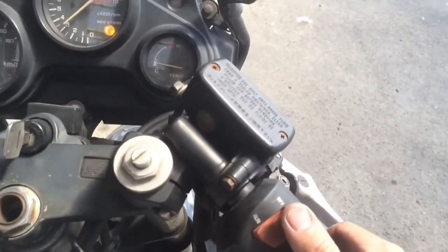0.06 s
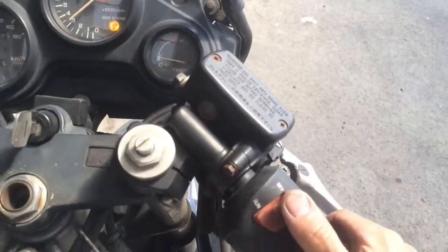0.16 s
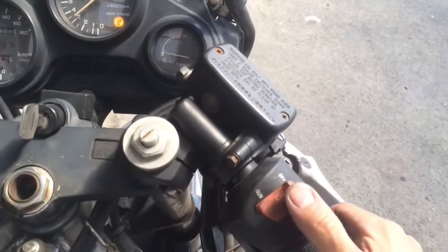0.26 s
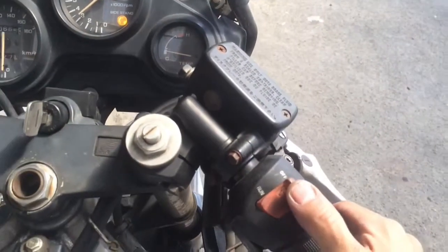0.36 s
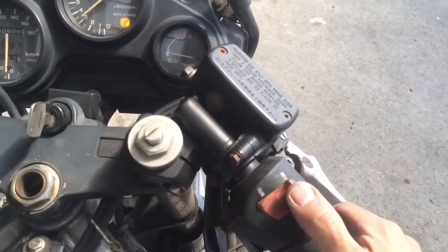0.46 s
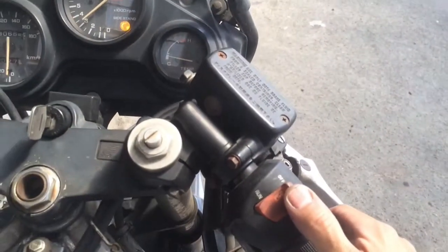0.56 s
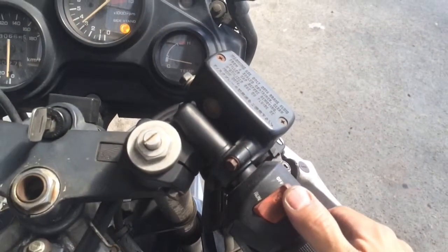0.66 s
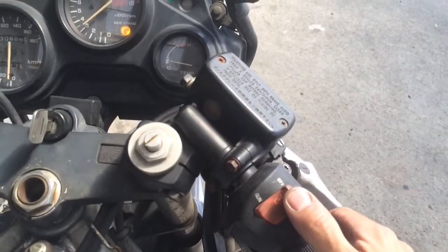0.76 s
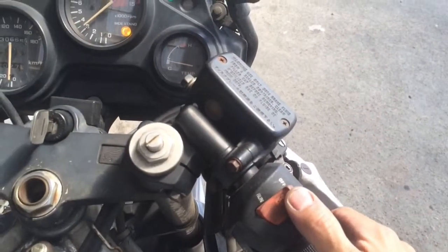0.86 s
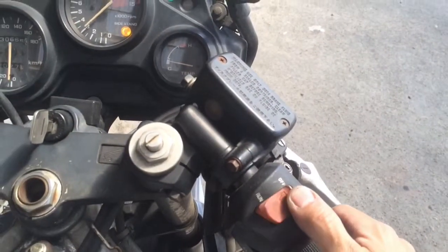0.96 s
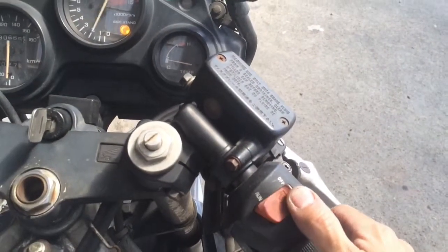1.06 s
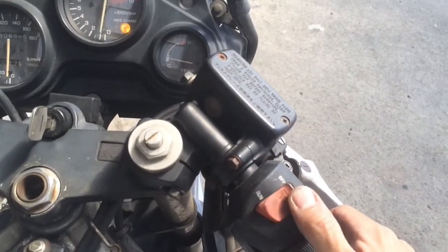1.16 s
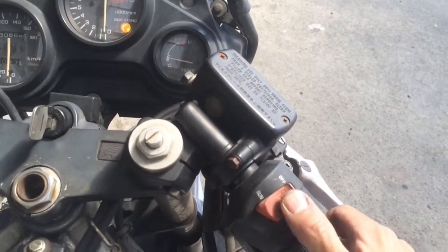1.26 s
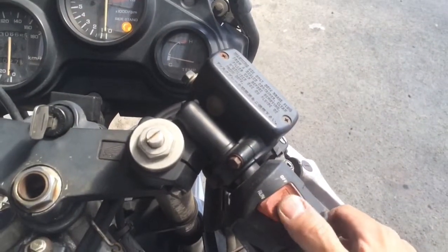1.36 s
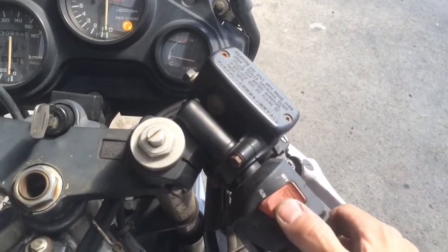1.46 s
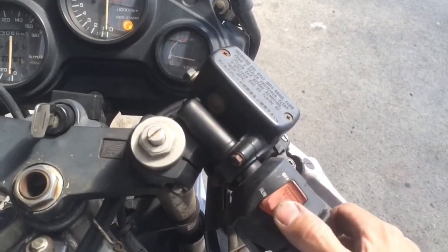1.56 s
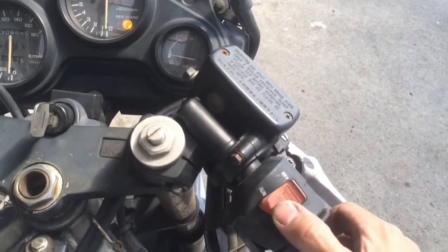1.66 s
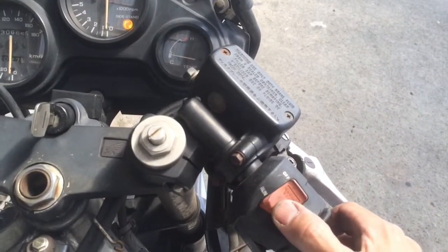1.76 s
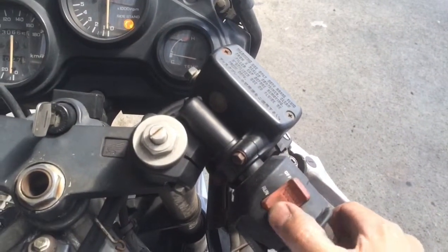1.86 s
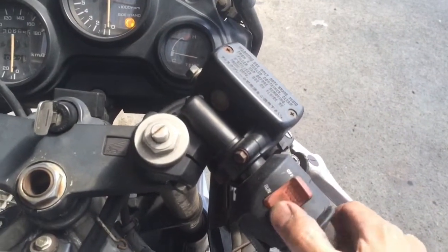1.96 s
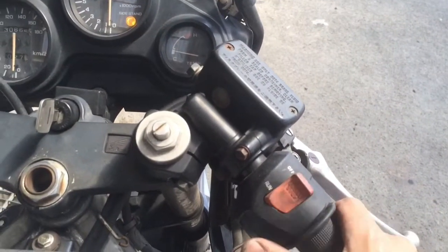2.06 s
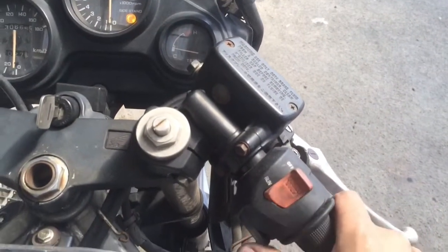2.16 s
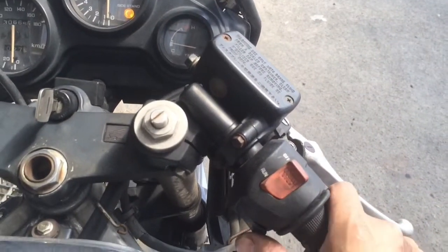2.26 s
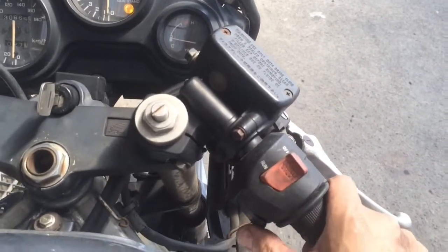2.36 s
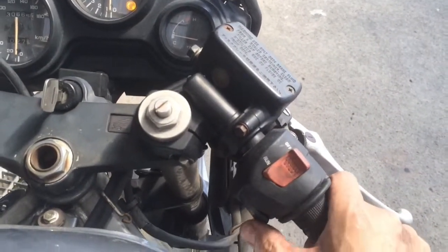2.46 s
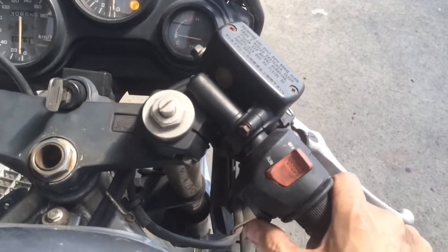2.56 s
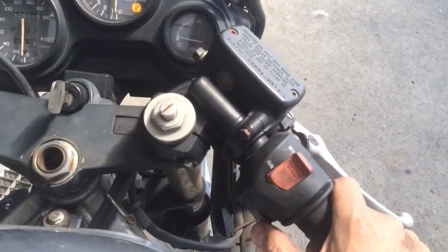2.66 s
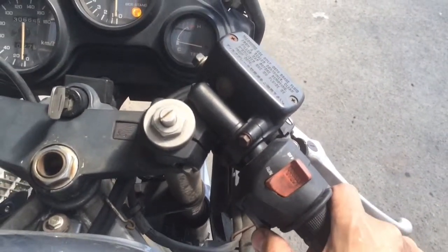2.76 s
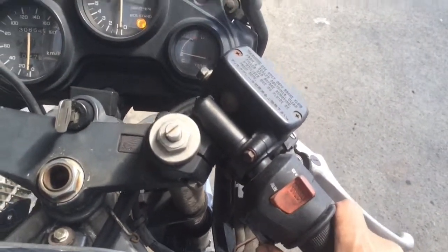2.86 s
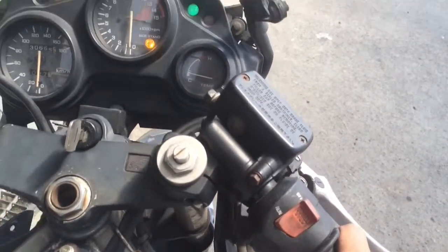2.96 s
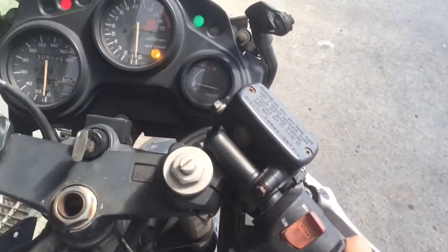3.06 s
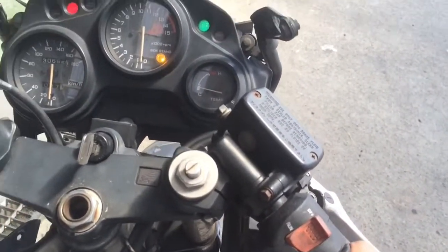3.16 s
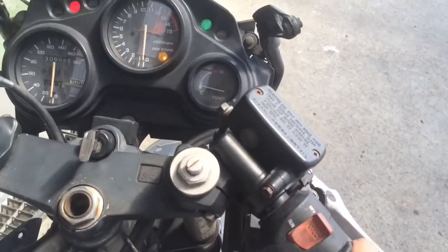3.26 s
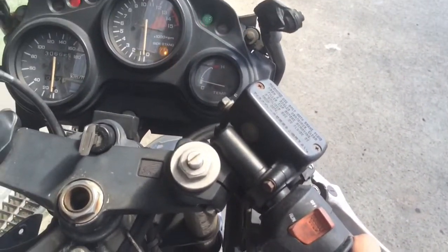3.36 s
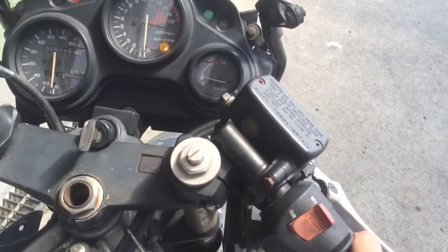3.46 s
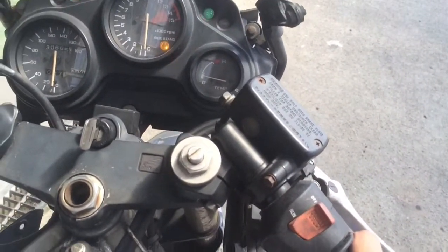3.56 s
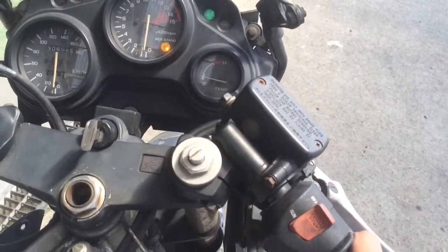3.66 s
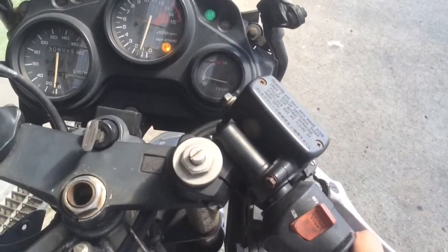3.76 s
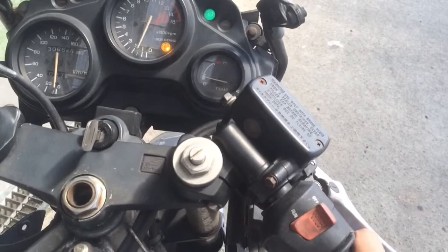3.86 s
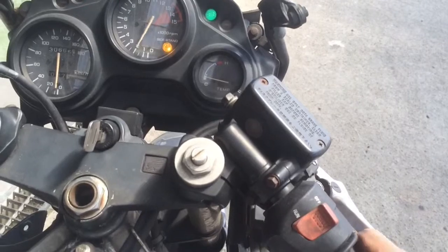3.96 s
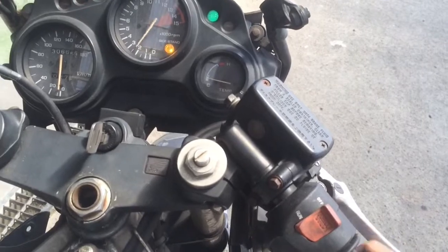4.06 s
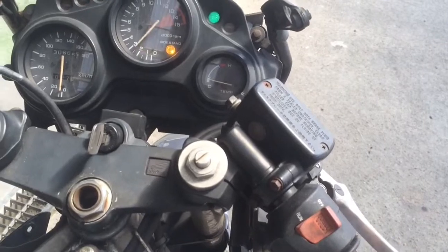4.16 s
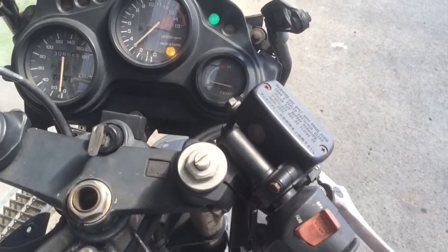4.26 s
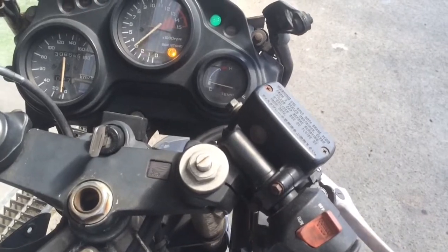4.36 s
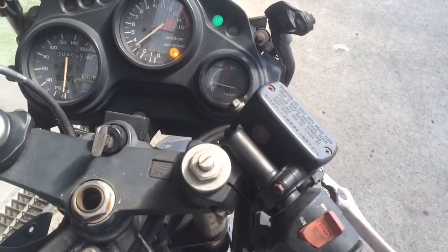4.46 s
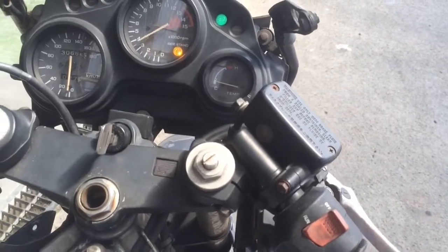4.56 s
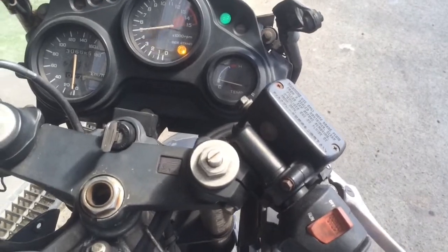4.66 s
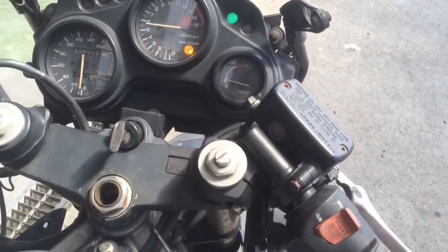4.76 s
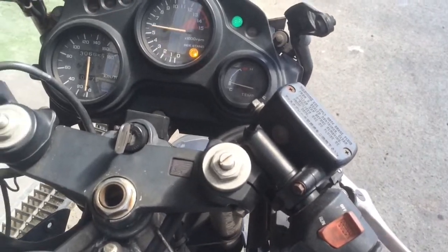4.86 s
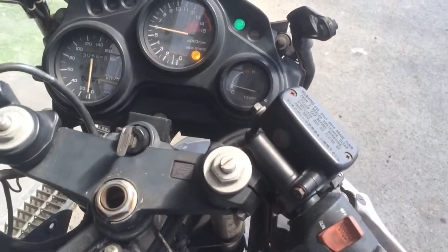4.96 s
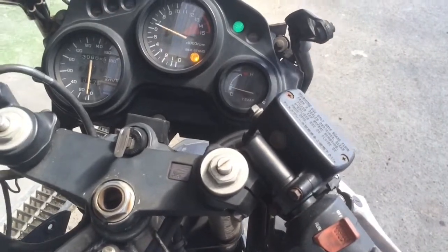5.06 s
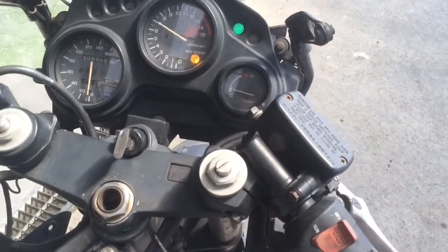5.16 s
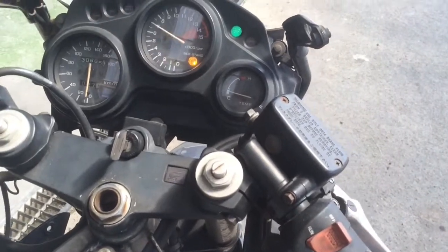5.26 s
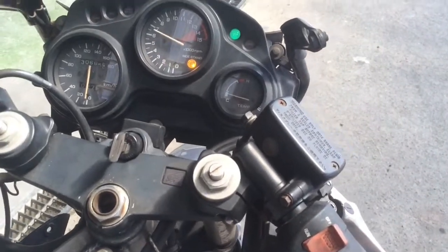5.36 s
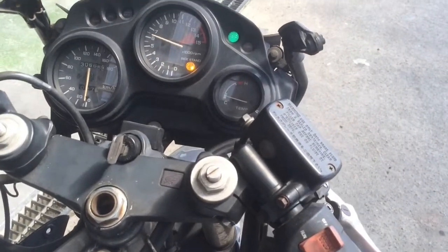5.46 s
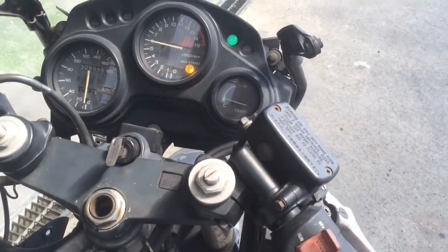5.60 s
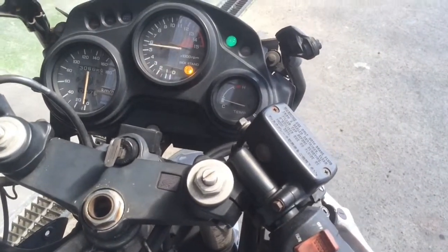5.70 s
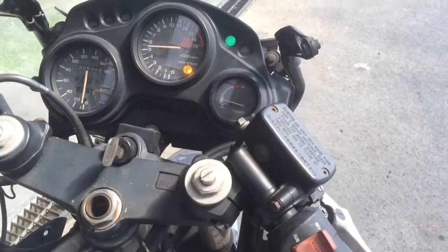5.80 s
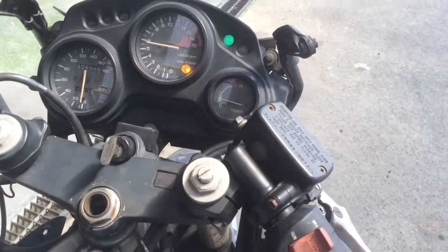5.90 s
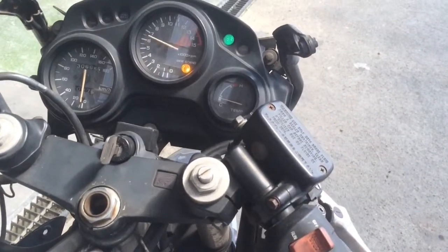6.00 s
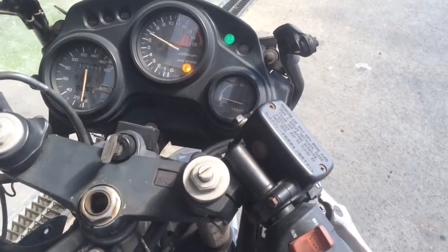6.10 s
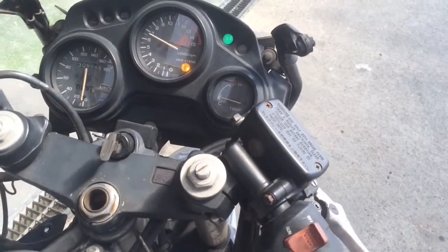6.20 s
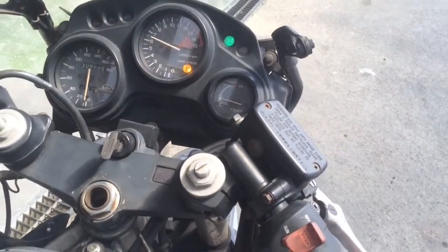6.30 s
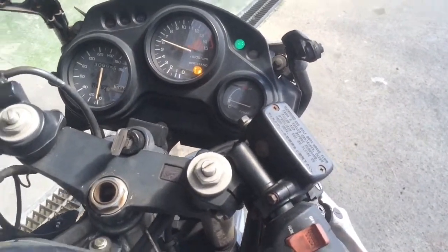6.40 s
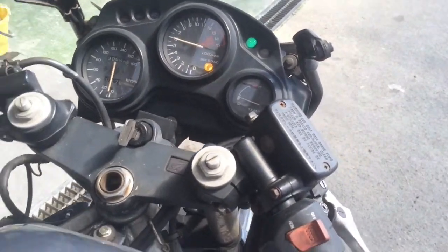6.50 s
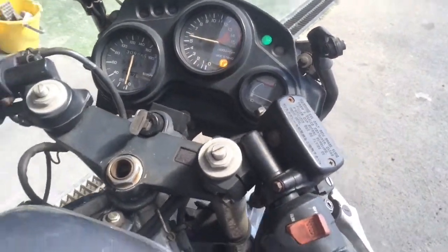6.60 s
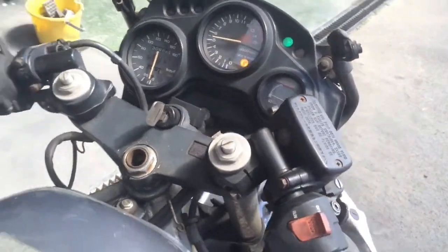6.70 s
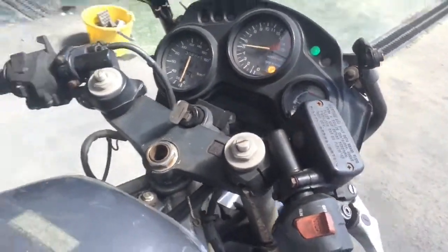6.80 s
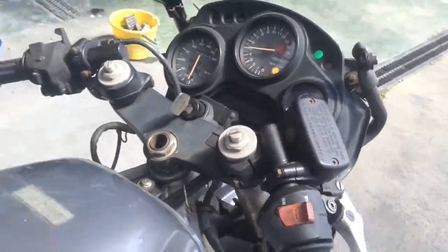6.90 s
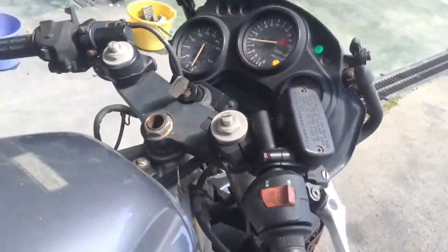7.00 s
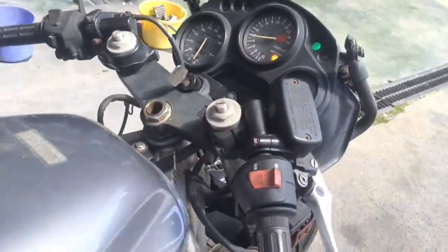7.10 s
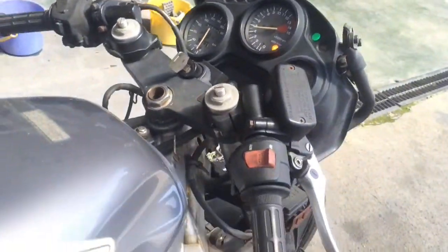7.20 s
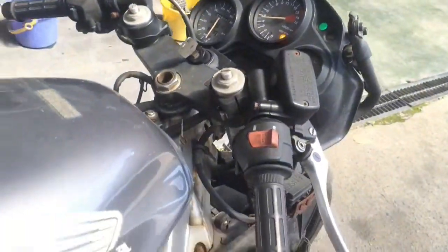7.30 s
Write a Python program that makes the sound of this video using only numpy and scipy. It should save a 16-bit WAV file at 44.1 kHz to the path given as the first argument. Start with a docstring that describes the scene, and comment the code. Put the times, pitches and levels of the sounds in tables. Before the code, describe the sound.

Outdoors and close to the microphone, a motorcycle's quick, ticking idle is cut by the sharp click of its kill switch. It winds down and ends with a clack, leaving a faint distant engine. After a second click, the starter cranks for a moment and the engine fires unevenly, then picks up. Two quick revs and a later third follow, and the engine sinks back toward idle.

```python
"""An open yard, heard from the handlebar of a small four-cylinder motorcycle at a fast idle.
The kill switch snaps, the engine runs down and stops with a clack; another engine chugs far off.
The switch is reset, the starter cranks, the engine catches and the throttle is blipped three times.
Periodic firings and turbulent gas excite the resonances of pipe and airbox, valve impacts ring
the case and meshing gears whine; crank speed and load govern their pitch and loudness."""
import sys
import numpy as np
from scipy import signal
from scipy.fft import rfft, irfft, next_fast_len
from scipy.io import wavfile
from scipy.ndimage import uniform_filter1d, map_coordinates

SR = 44100
rng = np.random.default_rng(int(sys.argv[2]) if len(sys.argv) > 2 else 0)


def to_wav(s):
    """Save 16-bit WAV."""
    ch = np.atleast_2d(s).T  # columns
    pcm = np.round(np.clip(ch, -1, 1) * 32767)  # PCM
    wavfile.write(sys.argv[1], SR, pcm.astype(np.int16))


N = 323694
TIME = np.arange(N) / SR
KILL_S, STOP_S, CATCH_S = 1.04, 1.6, 3.68

# crank speed with the throttle shut (idle, run-down, restart): time_s, speed_hz
IDLE_SPEED = [(0, 51.4), (.3, 52.2), (1.055, 52.2), (1.22, 35.3), (1.36, 24.3), (1.6, 9), (3.7, 29.8),
              (3.87, 30.9), (4.03, 36.5), (4.21, 48.7), (4.3, 52.4), (4.55, 55.7), (4.75, 63.3)]
# twists of the throttle grip: open_s, shut_s, opening_fraction
THROTTLE_BLIPS = [(4.553, 4.737, .85), (4.963, 5.12, 1), (5.85, 6.031, 1)]
# engine loudness without load: speed_hz, shake_db, exhaust_db, clatter_db
UNLOADED_LEVELS = [(10.1, -50, -57, -62), (18, -40.5, -45, -54), (30, -40.5, -42.5, -44.5),
                   (43, -48, -39, -41.5), (53.1, -43.5, -37.5, -38.5), (69, -42.5, -36, -33),
                   (94.3, -41, -32, -31.5), (110.6, -45, -35.5, -30.5), (126.4, -43, -29, -25.5)]
# low harmonics, keyed by multiple of crank speed: level_db, full_load_gain_db
CRANK_ORDERS = {1: (1, -12.5), 2: (-1, 2.5), 4: (-13.5, 8), 6: (-27, 10), 10: (-43, 14)}
# how loud the low engine tones sound at each pitch (airbox and pipe resonances,
# rippled by a ground or wall reflection): pitch_hz, gain_db
LOW_TONE_GAIN = [(25, -78), (45, -57), (52, -50), (62, -36.5), (85, -34), (94, -43), (104, -50), (128, -31),
                 (149, -33), (161, -40), (172, -26.5), (187, -40), (208, -23), (218, -26), (232, -22),
                 (255, -22.5), (280, -27), (400, -19.5), (470, -32.5), (560, -5), (640, -11.5),
                 (760, -10.5)]
# airbox resonances: pitch_hz, bandwidth_hz, gain_db
AIRBOX_MODES = [(77.6, 16.4, 4), (121, 104, -6.5), (186, 30, 5), (302, 124, -10.5)]
# cylinders in firing order: relative_db, delay_cycles
FIRING_ORDER = [(19, -0.0027), (8, 0.0053), (13, -0.00079), (15, 0.0064)]
# exhaust pipe resonances: pitch_hz, bandwidth_hz, gain_db
PIPE_MODES = [(390, 40, 4), (531, 37, 4.5), (625.6, 28, 7.5), (732, 79, 0), (876, 51, -1.5), (1156, 68, -4),
              (1200, 480, -6.5), (1870, 450, -27)]
# spectrum of turbulent gas: frequency_hz, relative_db
GAS_SPECTRUM = [(120, -12.5), (250, -3.5), (380, -0.5), (580, 4), (800, -1.5), (1100, -1), (1500, -3.5),
                (2200, -19), (5000, -39)]
# spectrum of mechanical clatter: frequency_hz, relative_db
CLATTER_SPECTRUM = [(600, -29), (1100, -16), (1600, -2), (2000, 2), (2600, 0), (3000, -3.5), (3600, -2),
                    (4900, -9), (5600, -6.5), (6400, -9.5), (8000, -14), (10000, -20.5), (13000, -28),
                    (16000, -31)]
# resonances of cylinder head, covers and fairing: pitch_hz, bandwidth_hz, gain_db
CASE_MODES = [(1083, 19, -2), (1186, 29, 0), (1610, 90, 2), (1908, 58, 3), (2147, 19, 7.5),
              (2240, 170, -2.5), (2770, 29, -1), (3060, 9.2, -13), (3200, 76, -4.5), (3674, 66, -2.5),
              (4080, 270, -14.5), (4920, 160, -3), (6130, 160, -8.5)]
# gear whine peaks; rows with the same tooth count are one mesh that sings at several speeds: teeth_per_turn,
# relative_db, loudest_speed_hz, speed_spread_hz
GEAR_MESHES = [(44, -2, 30, 5), (44, -7, 44, 4.5), (44, -7, 55, 2), (33.6, -5.5, 76, 2.5),
               (33.6, -9, 82, 2), (16.8, -7, 115, 9)]
# harmonics of the distant engine: beat_multiple, level_db
CHUG_HARMONICS = [(2, -66), (3, -58), (4, -73), (5, -66), (6, -64), (7, -64), (8, -73), (9, -70), (10, -74),
                  (12, -74), (13, -74), (20, -70), (61, -77), (63, -76), (64, -78)]
# spectrum of the outdoor noise: frequency_hz, relative_db
YARD_SPECTRUM = [(45, -6), (70, -20), (170, -1), (330, -1.5), (520, 1), (700, -10), (900, -5), (1250, -7),
                 (1620, -4), (1950, -13), (3700, -15), (6000, -23), (9000, -31.5), (15000, -39)]
# impacts in the kill switch: start_s, level_db
SWITCH_CLICKS = [(1.0403, -11.5), (1.9712, -25), (1.9724, -14), (2.126, -50)]
# modes of its plastic rocker: pitch_hz, relative_db, t60_s
ROCKER_MODES = [(1085, -11.5, 0.022), (2390, -21, .004), (4840, -14, 0.012), (6500, -5, 0.0033),
                (7600, -8.5, 0.0047), (10800, -8, .003)]
# impacts of the starter drive, at the stop and on engaging: start_s, rattle_db, thud_db
DRIVE_CLACKS = [(1.608, -34, -36), (3.374, -36, -58)]
# spectrum of the struck crankcase: frequency_hz, relative_db
CRANKCASE_SPECTRUM = [(120, -52), (200, -4), (647, 3), (833, -1), (1040, -4.5), (1750, -4), (2290, -7),
                      (2550, -7.5), (6650, -12.5), (7150, -14), (15000, -31)]
# starter surges after each compression: start_s, length_s, pinion_hz, level_db
STARTER_SURGES = [(3.394, 0.084, 909, -43), (3.519, 0.059, 963, -35.5), (3.633, 0.027, 997, -34.5)]
# spectrum of the starter case: frequency_hz, relative_db
STARTER_SPECTRUM = [(71, -37), (120, -37), (191, -2), (310, -24), (380, -11), (616, -16.5), (852, -7.5),
                    (1250, -22), (1690, -14), (3300, -19), (4120, -21.5), (11500, -32.5), (15000, -55)]
# single hard firings: start_s, pipe_drive_db, airbox_drive_db
HARD_FIRINGS = [(3.714, -21.5, -15), (3.818, -34, -25), (3.884, -43, -35), (3.945, -26.5, -18),
                (4.008, -40, -15), (4.586, -13, -11.5)]


def from_db(db):
    """Decibels to amplitude ratio."""
    return 10 ** (np.asarray(db) / 20)


def rms_one(x):
    """Normalisation to unit mean power."""
    return x / np.sqrt(np.mean(x ** 2) + 1e-20)


def levelled(x):
    """Normalisation to unit power over a sliding 0.1 s."""
    return x / np.sqrt(np.abs(uniform_filter1d(x * x, SR // 10)) + 1e-12)


def at_hz(rows, hz):
    """Interpolation of each column on a logarithmic frequency axis."""
    points, *columns = np.transpose(rows)
    return [np.interp(np.log(hz), np.log(points), c) for c in columns]


def lagged(x, seconds):
    """First-order lag with the given time constant."""
    keep = np.exp(-1 / (seconds * SR))
    return signal.lfilter([1 - keep], [1, -keep], x)


def decay(start, t60):
    """Exponential decay after a blow, 60 dB in t60 seconds."""
    return (TIME >= start) * from_db(-60 * np.clip((TIME - start) / t60, 0, 4))


def drift(rate):
    """Smooth random modulation of unit power, through `rate` values a second."""
    knots = rng.standard_normal(8192)
    curve = map_coordinates(knots, [TIME[::16] * rate], order=3, mode="wrap")
    return rms_one(curve).repeat(16)[:N]


def gusts(cycles, depth):
    """Amplitude-modulated white noise, swelling once a cycle."""
    return rms_one(rng.standard_normal(N) * np.exp(depth * np.cos(2 * np.pi * cycles)))


def impulses(cycles, offsets, strength_db, scatter_db):
    """Impulse train: one click of random strength at each offset in every cycle."""
    scatter = rng.standard_normal((400, len(offsets)))
    at = np.interp(np.arange(len(scatter))[:, None] + offsets, cycles, np.arange(N)).astype(int)
    clicks = np.zeros(N)
    clicks[at] = from_db(strength_db + scatter_db * scatter)
    clicks[[0, -1]] = 0
    return clicks


def coloured(x, spectrum):
    """Minimum-phase filter of unit mean power gain that follows a spectrum."""
    size = next_fast_len(N + SR // 4)
    hz, db = np.transpose(spectrum)
    f = np.fft.rfftfreq(size, 1 / SR) + 1
    skirts = np.minimum(f / hz[0], 1) ** 2 * np.minimum(hz[-1] / f, 1) ** 2
    gain = from_db(np.interp(np.log(f), np.log(hz), db)) * skirts
    cepstrum = irfft(np.log(rms_one(gain)), size)
    response = np.exp(rfft(2 * cepstrum[:size // 2], size) - cepstrum[0])
    return irfft(rfft(x, size) * response, size)[:N]


def resonate(x, modes):
    """Superposition of damped resonators with alternating signs."""
    out = 0
    for k, (hz, width, db) in enumerate(modes):
        r = np.exp(-np.pi * width / SR)
        poles = [1, -2 * r * np.cos(2 * np.pi * hz / SR), r * r]
        ring = signal.lfilter([1, 0, -1], poles, x + 1e-18)
        out = out + (-1) ** k * from_db(db) * (1 - r * r) / 2 * ring
    return out


def throttle_opening(opening_s=.086, shutting_s=.061):
    """Trapezoidal pulses: each blip opens the throttle, holds it and lets it snap shut."""
    out = 0
    for opens, shuts, opening in THROTTLE_BLIPS:
        ramps = np.minimum((TIME - opens) / opening_s, 1 - (TIME - shuts) / shutting_s)
        out = out + opening * np.clip(ramps, 0, 1)
    return out


def crank_speed(throttle, full_rise_hz=191, flywheel_s=.558):
    """Rotational inertia: the flywheel lags the throttle as it rises above idle and falls back."""
    idle = np.interp(TIME, *np.transpose(IDLE_SPEED))
    return idle + full_rise_hz * lagged(throttle, flywheel_s)


def drone(turns, speed, load, waver=0.046, load_rough=0.099, surge_db=0.53):
    """Forced vibration: imbalance and firing tones sweep through resonances and a reflection's ripple."""
    out = 0
    for order, (db, load_db) in CRANK_ORDERS.items():
        response_db, = at_hz(LOW_TONE_GAIN, order * speed)
        rough = waver + load_rough * np.sqrt(order) * load
        swing_db = surge_db * order * speed / 100 * drift(22)  # higher tones surge more
        level = from_db(db + response_db + load_db * load + swing_db) * (1 + rough * drift(140))
        out = out + level * np.sin(2 * np.pi * order * turns + rough * drift(140))
    return np.sqrt(2) * out


def shake(turns):
    """Cavity resonance: a lopsided push each cycle and turbulent gulps of air excite the airbox."""
    lope = impulses(turns / 2, np.zeros(1), 0, scatter_db=9.5)
    return levelled(resonate(rms_one(lope) + gusts(2 * turns, depth=0.6), AIRBOX_MODES))


def exhaust(turns, speed, load, sputter, tuned_hz=53, load_turbulence=0.27):
    """Pipe resonance and turbulence: each firing rings the air column and blows a puff of gas."""
    strength_db, delay = np.transpose(FIRING_ORDER)
    firings = impulses(turns / 2, np.arange(4) / 4 + delay, strength_db, scatter_db=.7)
    bark = levelled(resonate(firings, PIPE_MODES))
    # ringing gives way to noise off the tuned speed, under load and while sputtering
    clean = .85 * np.minimum((speed / tuned_hz) ** 4, (tuned_hz / speed) ** 1.5)
    clean = clean * np.clip(1 - sputter - load_turbulence * load, 0, 1)
    puffs = coloured(gusts(2 * turns, depth=0.25), GAS_SPECTRUM)
    return from_db(-1.7) * np.sqrt(clean) * bark + from_db(0.8 * load) * np.sqrt(1 - clean) * puffs


def clatter(turns, contacts=24):
    """Impact excitation: valves and cam chain tick through each cycle and ring the case as gears rush."""
    offsets = (np.arange(contacts) + rng.random(contacts)) / contacts
    ticks = impulses(turns / 2, offsets, rng.normal(0, 1.9, contacts), scatter_db=4.0)
    bursts = rng.standard_normal(N) * lagged(ticks, seconds=0.0044)
    valves = levelled(coloured(bursts, CLATTER_SPECTRUM))
    rush = gusts(2 * turns, depth=0.067)
    case = levelled(resonate(levelled(ticks) + rush, CASE_MODES))
    return from_db(-2.5) * valves + from_db(-2) * coloured(rush, CLATTER_SPECTRUM) + from_db(-5) * case


def whine(turns, speed, flicker_db=3.0):
    """Tooth-passing tones, phase-modulated by backlash; each mesh sings loudest in one or more ranges of speed."""
    out = 0
    for teeth, db, loudest_hz, spread_hz in GEAR_MESHES:
        nearness = np.exp(-.5 * ((speed - loudest_hz) / spread_hz) ** 2)
        level = from_db(db + flicker_db * drift(70)) * nearness
        backlash = 1.3 * drift(130)
        out = out + level * np.sin(2 * np.pi * teeth * turns + backlash)
    return np.sqrt(2) * out


def engine(fill_s=0.017, linger_s=0.14, coasting_db=-3, fade_s=0.22, settle_s=1.15):
    """Four-stroke cycle: all parts repeat over two crank turns, at levels set by speed and load."""
    throttle = throttle_opening()
    speed = crank_speed(throttle)
    load = np.maximum(lagged(throttle, fill_s), lagged(throttle, linger_s))
    turns = np.cumsum(speed * (1 + .0015 * drift(25))) / SR
    turning = np.clip(np.maximum(STOP_S - TIME, TIME - CATCH_S) / 0.019, 0, 1)
    coasting = from_db(coasting_db * np.clip((TIME - KILL_S) / fade_s, 0, 1) * (TIME < CATCH_S))
    # uneven firing just after the catch: more shake, weaker tones
    sputter = (TIME > CATCH_S) * np.clip(1 - (TIME - CATCH_S) / settle_s, 0, 1)
    full_load_db = (-39.5, -24.5, -27.5)  # shake, exhaust, clatter; added in power
    shake_gain, exhaust_gain, clatter_gain = [
        coasting * np.hypot(from_db(db), load * from_db(load_db))
        for db, load_db in zip(at_hz(UNLOADED_LEVELS, speed), full_load_db)]
    tones = from_db(-0.5 * sputter ** 2) * drone(turns, speed, load)
    airbox = from_db(5 * np.sqrt(sputter)) * shake_gain * shake(turns)
    pipe = exhaust_gain * exhaust(turns, speed, load, sputter)
    machinery = clatter_gain * (clatter(turns) + whine(turns, speed))
    return turning * (tones + airbox + pipe + machinery)


def yard(beat_hz=24.55):
    """A distant engine's harmonic series, fluctuating as it propagates, over broadband outdoor noise."""
    beats = np.cumsum(beat_hz * (1 + .005 * drift(6))) / SR
    chug = sum(from_db(db + drift(59)) * np.cos(2 * np.pi * order * beats + rng.standard_normal())
               for order, db in CHUG_HARMONICS)
    return np.sqrt(2) * chug + from_db(-56.5) * coloured(gusts(beats, depth=0.048), YARD_SPECTRUM)


def kill_switch(crack_db=-11, scatter_db=-45):
    """Impulse response: the rocker cracks and rings in its modes; the yard scatters a faint tail back."""
    clicks, crack, tail = np.zeros(N), 0, 0
    for start, db in SWITCH_CLICKS:
        clicks[round(start * SR)] += from_db(db)
        crack = crack + from_db(db + crack_db) * decay(start, t60=0.017)
        tail = tail + from_db(db + scatter_db) * decay(start, t60=0.29)
    age = TIME[:SR // 10]
    ring = sum(from_db(db - 60 * age / t60) * np.sin(2 * np.pi * hz * age)
               for hz, db, t60 in ROCKER_MODES)
    snap = signal.fftconvolve(clicks, ring)[:N] + crack * rng.standard_normal(N)
    return snap + tail * coloured(rng.standard_normal(N), CLATTER_SPECTRUM)


def clacks(thud_hz=190):
    """Damped free vibration: the starter drive strikes, the crankcase rattles and the frame thuds."""
    rattle = sum(from_db(db) * (decay(start, t60=.06) + from_db(-14) * decay(start, t60=.45))
                 for start, db, _ in DRIVE_CLACKS)
    thud = sum(from_db(db) * decay(start + .022, t60=0.15) for start, _, db in DRIVE_CLACKS)
    case = coloured(rattle * rng.standard_normal(N), CRANKCASE_SPECTRUM)
    return case + thud * np.sin(2 * np.pi * thud_hz * TIME)


def starter(attack_s=0.0098, release_t60=0.23, sag_hz_per_s=1500):
    """Gear-mesh tones and grinding over the armature's hum; each surge sags against a compression."""
    pinion_hz, level = STARTER_SURGES[0][2], 0
    for start, length, hz, db in STARTER_SURGES:
        age = TIME - start
        pinion_hz = np.where(age < 0, pinion_hz, np.maximum(hz - sag_hz_per_s * age, hz / 2))
        release = from_db(-60 * np.clip((age - length) / release_t60, 0, 4))
        level = level + from_db(db) * np.clip(age / attack_s, 0, 1) * release
    teeth = np.cumsum(pinion_hz * (1 + .025 * drift(45))) / SR
    whirr = sum(from_db(db) * np.sin(2 * np.pi * ratio * teeth + .7 * drift(130))
                for ratio, db in [(.21, -7), (1, -2), (1.5, -6), (2, -6), (2.7, -10), (3.4, -8)])
    grind = coloured(gusts(teeth / 5, depth=0.24), STARTER_SPECTRUM)
    return level * (whirr + grind)


def pops():
    """Transient excitation: a sudden gulp of mixture booms in the pipe and thumps in the airbox."""
    blows = sum(from_db(db) * decay(start, t60=0.027) for start, db, _ in HARD_FIRINGS)
    thumps = sum(from_db(db) * decay(start, t60=0.081) for start, _, db in HARD_FIRINGS)
    gas = coloured(rng.standard_normal(N), GAS_SPECTRUM)
    return resonate(blows * gas, PIPE_MODES) + resonate(thumps * gas, AIRBOX_MODES)


def scene():
    """Superposition: all sources add at one point, alike in both channels."""
    return np.tile(engine() + pops() + starter() + kill_switch() + clacks() + yard(), (2, 1))


def record(dry, cutoff_hz=15450):
    """An elliptic low-pass filter cuts the highest treble steeply."""
    return signal.sosfilt(signal.ellip(12, .1, 80, cutoff_hz, fs=SR, output="sos"), dry)


dry = scene()
out = record(dry)
to_wav(out)
```